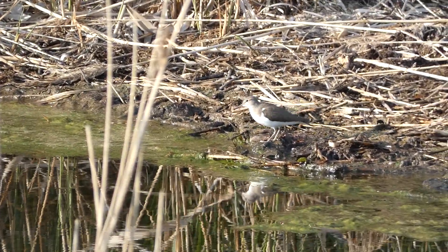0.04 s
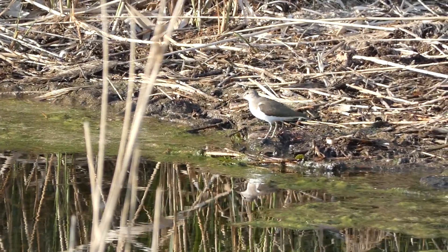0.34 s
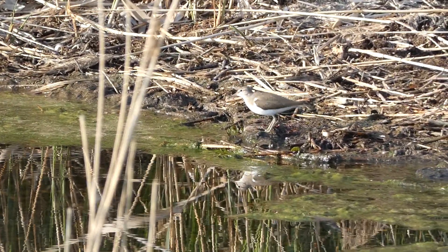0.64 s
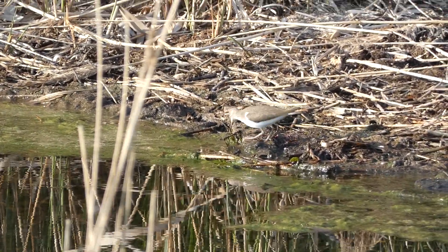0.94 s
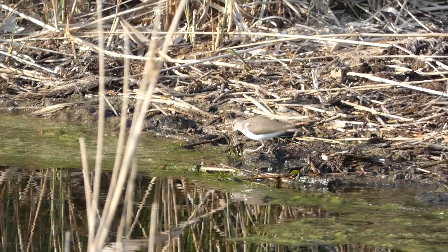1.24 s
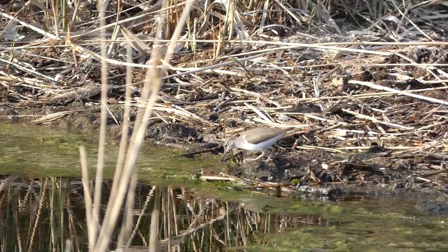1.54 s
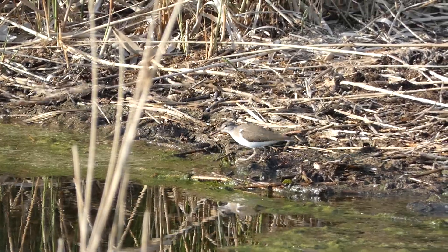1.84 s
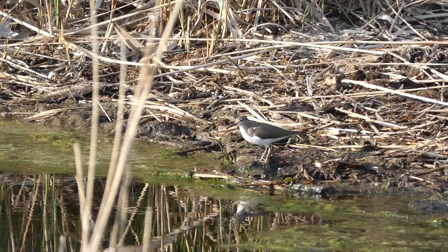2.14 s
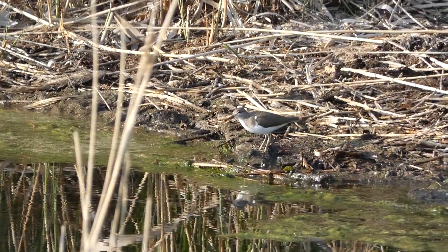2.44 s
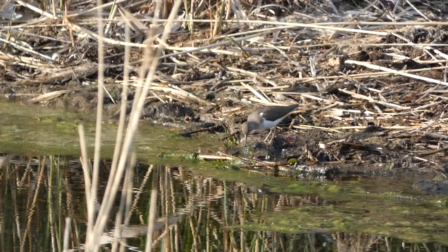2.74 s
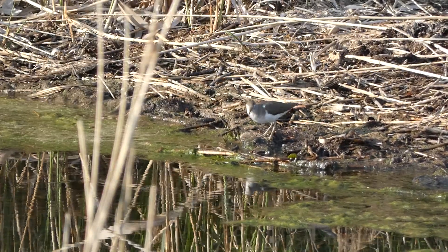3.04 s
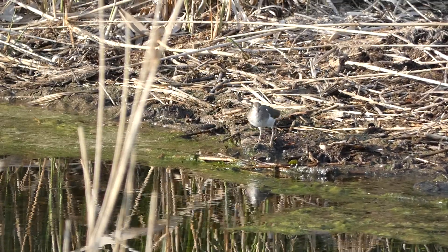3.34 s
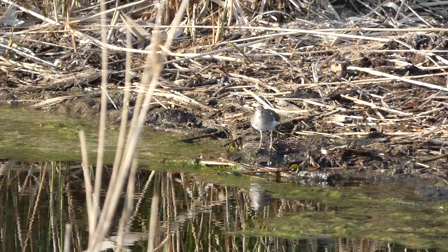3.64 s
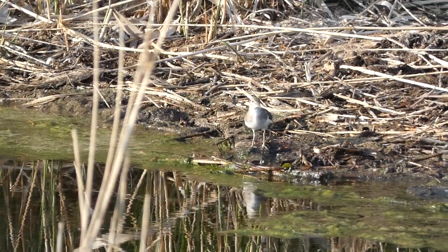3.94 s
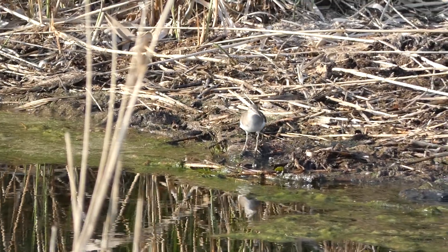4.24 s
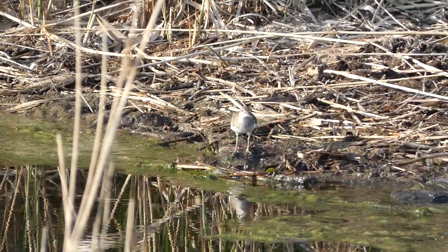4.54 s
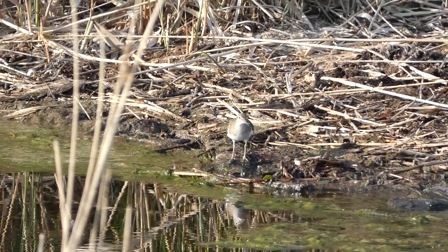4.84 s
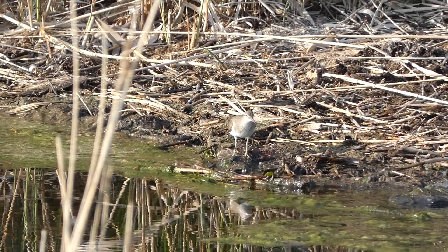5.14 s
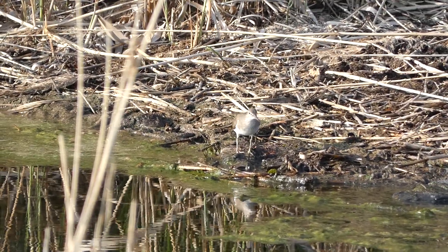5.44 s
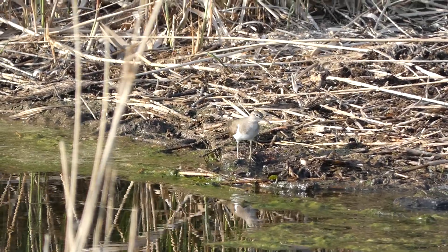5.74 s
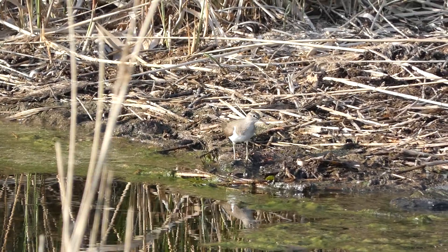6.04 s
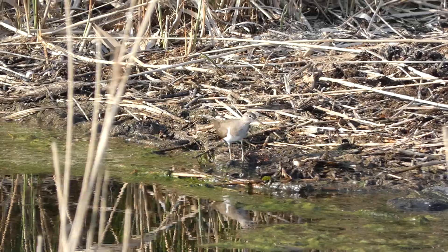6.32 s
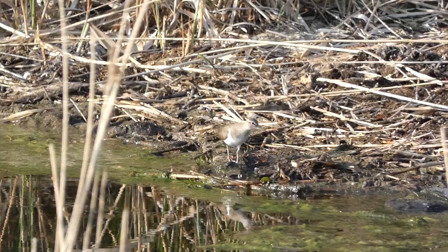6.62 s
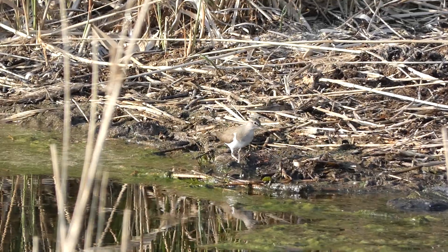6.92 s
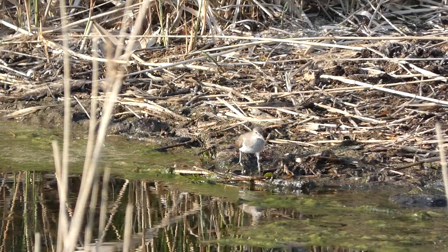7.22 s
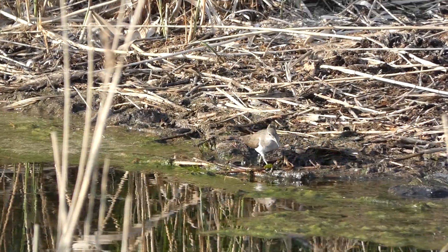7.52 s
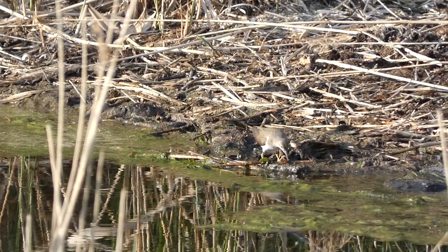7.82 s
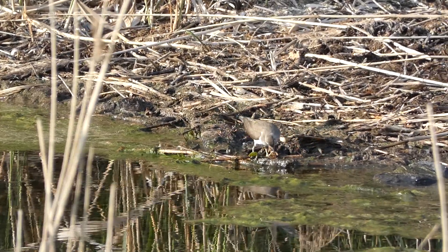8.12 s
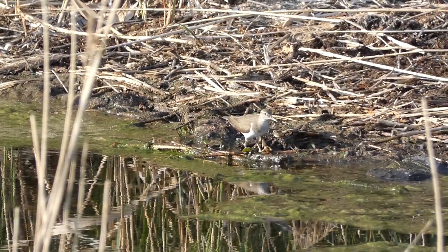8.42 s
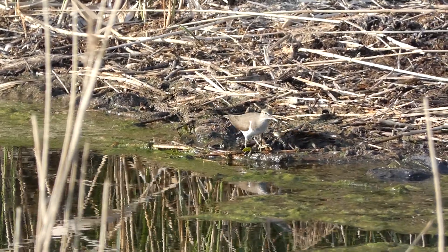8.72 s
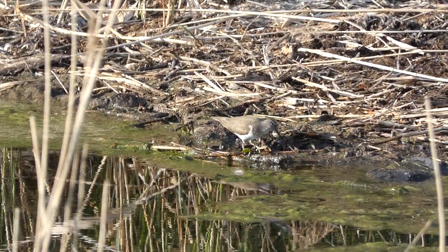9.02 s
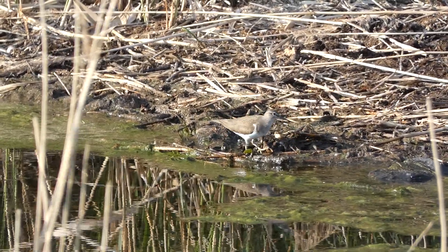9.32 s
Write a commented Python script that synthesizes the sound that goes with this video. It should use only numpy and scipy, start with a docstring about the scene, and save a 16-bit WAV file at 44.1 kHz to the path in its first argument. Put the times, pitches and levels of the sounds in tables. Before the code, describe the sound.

Small marsh birds chirp, buzz and warble amid crickets and a faint frog chorus, as low gusts of wind buffet the microphone.

```python
"""Marsh edge in a light breeze

Gusts buffet the microphone, their eddies rumbling and thumping. Out in the reeds, a little to the right,
small birds whistle, warble, rasp and chatter in quick pitch glides; three thin, high whistles arch
overhead. Two sharp knocks ring close by, and crickets chirp unevenly with their wings near 5 kHz.
Far off, frogs ring near 2 kHz over a low drone."""
import sys
import numpy as np
from scipy import signal
from scipy.fft import rfft, irfft, next_fast_len
from scipy.io import wavfile
from scipy.ndimage import uniform_filter1d

SR = 44100
rng = np.random.default_rng(int(sys.argv[2]) if len(sys.argv) > 2 else 0)


def bounce(signal):
    """Save signal as a 16-bit WAV file at the path given by the first command-line argument."""
    frames = np.transpose(np.atleast_2d(signal))
    limited = np.clip(frames, -1, 1)
    pcm = np.round(limited * 32767).astype(np.int16)
    wavfile.write(sys.argv[1], SR, pcm)


N = 417627
TIME = np.arange(N) / SR


def from_db(db):
    """Decibels to gain."""
    return np.exp(np.asarray(db) * np.log(10) / 20)


def unit_rms(x):
    """Scale to unit power."""
    return x / np.sqrt(np.mean(x ** 2) + 1e-20)


def in_time(rows, t=TIME):
    """The columns of a curve at the times t."""
    s, *columns = np.transpose(rows)
    return [np.interp(t, s, c) for c in columns]


def at_hz(points, hz):
    """Read a table on a log-frequency axis."""
    freqs, values = np.transpose(points)
    return np.interp(np.log(hz + 1e-9), np.log(freqs), values)


def drift(rate, size=N):
    """A smooth random wander of rms 1 that changes about rate times a second."""
    step, settle = 40, 2000
    pole = np.exp(-2 * np.pi * rate * step / SR)
    white = rng.standard_normal(size // step + settle + 2)
    slow = signal.lfilter([1], [1, -2 * pole, pole * pole], white)[settle:]
    return np.interp(np.arange(size) / step, np.arange(len(slow)), unit_rms(slow))


def add(track, s, sound):
    """Mix a sound into a track at time s."""
    at = round(s * SR)
    part = sound[max(-at, 0):max(N - at, 0)]
    track[max(at, 0):max(at, 0) + len(part)] += part


def panned(x, right_db):
    """Lean a sound to the right."""
    return x * from_db(np.array([[-right_db], [right_db]]) / 2)


def shaped(spectrum, skirt=4):
    """A colour that follows a spectrum and falls away past its ends."""
    low, high = spectrum[0][0], spectrum[-1][0]
    return lambda hz: (from_db(at_hz(spectrum, hz))
                       * np.minimum(hz / low, 1) ** skirt / np.maximum(hz / high, 1) ** skirt)


def resonance(centre_hz, half_width_hz):
    """A colour with one steep-sided peak."""
    return lambda hz: 1 / (1 + ((hz - centre_hz) / half_width_hz) ** 2)


def tone(hz):
    """A sine that follows a pitch curve."""
    return np.sin(2 * np.pi * (np.cumsum(hz) / SR + rng.random()))


def swell(u, edge):
    """Rise and fall of a note as u goes from 0 to 1; a small edge is abrupt."""
    return np.maximum(np.sin(np.pi * u), 0) ** edge


def syllables(rows, shape, vary=0.013, rough=0.0045):
    """One bird syllable repeated, a little higher or lower each time."""
    out, t = np.zeros(N), np.arange(0, shape[-1][0], 1 / SR)
    hz, contour_db = in_time(shape, t)
    for s, level_db in rows:
        pitch = hz * (1 + vary * rng.normal() + rough * drift(270, len(t)))
        add(out, s, from_db(level_db + contour_db) * swell(t / t[-1], 0.18) * tone(pitch))
    return out


# The far ambience across the stereo microphone: (frequency [Hz], left-right correlation [0-1])
AMBIENT_LIKENESS = [(60, 1), (200, 0.23), (500, 0.76), (800, 0.31), (1250, 0.016), (2100, 0.62),
                    (4500, 0.93), (8000, 0.38), (14000, 0.43)]
# Its lean: (frequency [Hz], left minus right [dB])
AMBIENT_BALANCE = [(60, -10), (110, 1), (200, -12), (380, -1.5), (700, -2), (1290, -2.5), (2380, -5),
                   (4400, -2), (8120, -3), (15000, 2)]


def noise(colour, likeness=AMBIENT_LIKENESS, balance=AMBIENT_BALANCE):
    """Steady stereo noise of rms 1, its spectrum shaped by colour(Hz)."""
    size = next_fast_len(N, True)
    hz = np.arange(size // 2 + 1) * SR / size
    mid, side = rfft(rng.standard_normal((2, size)))
    alike, sides = np.clip(at_hz(likeness, hz), -.99, .99), np.array([[1], [-1]])
    channels = np.sqrt(1 + alike) * mid + np.sqrt(1 - alike) * side * sides
    channels *= from_db(sides * at_hz(balance, hz) / 2)
    return unit_rms(irfft(channels * colour(hz))[:, :N])


# Gusts on the microphone: (time [s], length [s], level [dB], deep thud relative to the rumble [dB])
GUSTS = [(0.592, 0.33, -38, -5.5), (1.03, 0.33, -35, 0.5), (1.526, 0.085, -25.5, -5.5),
         (1.702, 0.024, -28, -1), (1.836, 0.34, -28, -5), (2.241, 0.41, -26, -9.5),
         (2.757, 0.59, -29, -12.5), (3.433, 0.46, -30, 0), (4.66, 0.36, -38, 4), (5.122, 0.12, -31, -14),
         (5.402, 0.058, -33.5, -0.5), (5.608, 0.54, -28, 0), (6.278, 0.53, -28, -9.5),
         (6.979, 0.24, -30, -8.5), (7.299, 0.65, -29, -10.5), (8.041, 0.84, -27.5, -26),
         (9.019, 0.23, -29.5, -29)]


def gusts(attack_s=0.093, release_s=0.054, sag_db_per_s=3, lull_db=-56.5):
    """Each gust hits, slackens and drops away; gives the wind's level and the thud's weight in dB."""
    power = np.full(N, from_db(lull_db) ** 2)
    deep = power.copy()
    for s, length, level_db, deep_db in GUSTS:
        t = TIME - s
        attack = np.clip(1 + t / attack_s, 0, 1) ** 2
        release = np.exp(-np.maximum(t - length, 0) / release_s)
        gust = (from_db(level_db - sag_db_per_s * t) * attack * release) ** 2
        power += gust
        deep += gust * from_db(deep_db) ** 2
    return 10 * np.log10(power), 10 * np.log10(deep / power)


# Wind rumble on the microphone: (frequency [Hz], level [dB])
RUMBLE_SPECTRUM = [(85, -11.5), (130, 1.5), (200, -1.5), (270, -9)]
# Wind across its two sides: (frequency [Hz], left-right correlation [0-1])
WIND_LIKENESS = [(60, 0.99), (130, 0.7), (250, 0.53), (400, 0.18)]
# The hardest buffets: (time [s], length [s], level [dB])
BUFFETS = [(1.579, 0.0098, -19), (2.933, 0.4, -32.5), (6.354, 0.15, -26.5), (7.297, 0.082, -27),
           (8.098, 0.44, -36.5)]


def wind(low_db=-0.12, upper_db=-11, lumps_db=4, surge_db=2.5, harden=0.46, steady_s=0.071):
    """Eddies hit the microphone in lumps; the hardest ones reach higher in pitch."""
    gust_db, deep_db = gusts()
    gust_db += surge_db * drift(9.7)
    eddies, buffets = drift(31.3), np.zeros(N)
    for s, length, db in BUFFETS:
        add(buffets, s, from_db(db) * signal.windows.tukey(int(length * SR), .5))
    thud = from_db(deep_db) * noise(shaped([(65, -8.5), (105, 0.5)]), WIND_LIKENESS, [(100, 0.0053)])
    rumble = noise(shaped(RUMBLE_SPECTRUM), WIND_LIKENESS, [(100, 0.0028)])
    low = (thud + rumble) * from_db(lumps_db * eddies)
    upper = noise(shaped([(230, 3), (330, 0), (480, -11.5), (800, -35)]), WIND_LIKENESS, [(300, -4.5)])
    upper *= from_db(6.5 * eddies)
    # Even out the slow swings, so that only the quick lumps ride on the gusts.
    low, upper = [band / np.sqrt(uniform_filter1d(np.mean(band ** 2, axis=0), int(steady_s * SR)))
                  for band in (low, upper)]
    upper_gain = from_db(gust_db + upper_db + harden * (gust_db + 20)) + buffets
    return from_db(gust_db + low_db) * low + upper_gain * upper


# Single eddies right on the microphone: (time [s], level [dB], pitch [Hz])
THUMPS = [(1.511, -13, 140), (1.584, -11, 181), (1.801, -14, 121), (2.031, -12, 131), (2.282, -10.5, 156),
          (2.43, -11, 134), (2.629, -10.5, 127), (3.412, -17.5, 159), (5.096, -16, 145), (5.809, -17, 204),
          (6.292, -11, 148), (6.33, -11.5, 160), (6.375, -18, 196), (7.176, -12, 189), (7.322, -13, 206),
          (7.417, -12.5, 176), (7.786, -17, 184), (8.058, -16, 209), (8.113, -14, 186), (8.237, -14, 175),
          (9.15, -12, 241)]


def thumps(gain_db=-4, rise_s=0.0065, pan_spread_db=3, sink=0.07):
    """An eddy shoves the microphone: a few low swings that build quickly, sink in pitch and die."""
    out, u = np.zeros((2, N)), np.arange(0, 9, 1 / (rise_s * SR))
    envelope = (u * np.exp(1 - u)) ** 2
    for s, level_db, hz in THUMPS:
        pitch = hz * (1 + sink * (np.exp(-u) * 2 - 1) + 0.13 * drift(110, len(u)))
        shove = from_db(level_db + gain_db) * envelope * tone(pitch)
        for channel, part in zip(out, panned(shove, pan_spread_db * rng.normal())):
            add(channel, s, part)
    return out


# Swallow-like chatter off to the right: (time [s], sweeps [count], level [dB])
RATTLES = [(3.013, 3, -41), (3.278, 3, -39.5), (3.519, 5, -40.5), (3.827, 4, -40.5), (5.041, 1, -47),
           (5.178, 1, -45), (5.209, 1, -42.5)]
# One sweep, then its tail: (time into the sweep [s], pitch [Hz], level [dB])
SWEEP = [(0, 4295, -17), (.005, 3630, -5.5), (0.01, 2650, -0.5), (0.014, 2300, -7)]
SWEEP_TAIL = [(.012, 3425, -7.5), (.018, 3140, -2.5), (.023, 2950, -12), (.028, 2870, -20)]


def chatter(period_s=.031, edge_db=-8.5, sweep_db=-3, tail_db=-4, low_ratio=0.67, low_db=-1.5):
    """A bird rattles off steep downward sweeps with two-voiced tails, loudest in mid-rattle."""
    beats = [(s + k * period_s, level_db + edge_db * ((2 * k + 1) / round(count) - 1) ** 2)
             for s, count, level_db in RATTLES for k in range(round(count))]
    delay, tails = SWEEP_TAIL[0][0], np.zeros(N)
    for ratio, voice_db in ((1, 0), (low_ratio, low_db)):
        starts = [(s + delay, db + voice_db) for s, db in beats]
        shape = [(s - delay, hz * ratio, db) for s, hz, db in SWEEP_TAIL]
        tails += syllables(starts, shape, vary=0.028, rough=0.019)
    sweeps = syllables(beats, SWEEP, vary=.04, rough=.05)
    return from_db(sweep_db) * sweeps + from_db(tail_db) * tails


# Whistles in the reeds: (time [s], length [s], start [Hz], middle [Hz], end [Hz], level [dB])
WHISTLES = [(2.24, 0.038, 2180, 2580, 2790, -59), (2.282, .032, 2300, 2500, 3200, -65),
            (0.189, 0.055, 3310, 3210, 3070, -54), (0.22, 0.031, 3120, 2450, 2030, -59),
            (1.336, 0.029, 4880, 5230, 5050, -54.5), (1.467, 0.025, 2000, 2090, 2080, -49.5),
            (0.217, 0.14, 3760, 3740, 3850, -63), (1.08, 0.069, 3240, 3940, 3900, -71),
            (3.003, .03, 2280, 2900, 2690, -53.5), (2.055, 0.011, 2200, 2380, 2490, -51),
            (2.098, 0.027, 2400, 2160, 3000, -51.5), (4.072, 0.09, 6650, 5600, 6200, -67.5),
            (4.254, 0.069, 6400, 5700, 6000, -61), (4.255, .05, 3650, 3270, 2280, -55),
            (4.849, 0.019, 2311, 3296, 4270, -47.5), (5.089, 0.072, 4700, 3950, 3980, -55.5),
            (5.118, .055, 3350, 2920, 2500, -62), (5.295, 0.056, 4250, 4020, 3950, -57),
            (5.366, .036, 3620, 3900, 3450, -60), (5.404, 0.0056, 3900, 3100, 2900, -53),
            (5.414, .009, 3700, 3210, 2700, -46.5), (5.423, 0.0265, 3400, 2670, 3500, -52),
            (5.297, 0.084, 3870, 3240, 3380, -56.5), (5.502, 0.067, 3080, 2960, 2963, -59.5),
            (5.551, 0.072, 3700, 3500, 2870, -54.5), (5.711, 0.08, 3200, 2930, 3600, -58),
            (5.798, 0.042, 3700, 2940, 2700, -55.5), (5.96, 0.039, 2444, 2960, 3340, -61.5),
            (6.098, 0.06, 2600, 3130, 3200, -58.5), (6.04, .014, 2600, 2370, 2050, -56),
            (6.95, 0.022, 2900, 3230, 4040, -59), (7.261, 0.038, 2510, 2540, 3000, -58),
            (7.378, 0.082, 2380, 2650, 2830, -61), (6.598, 0.023, 2850, 3050, 3200, -66),
            (7.11, .065, 2200, 2620, 2850, -65), (8.004, 0.063, 3300, 3720, 4200, -66),
            (5.578, 0.032, 2740, 2450, 2200, -59)]


def whistles(quaver=0.016, flutter_db=2):
    """Each note bends smoothly through three pitches and flutters on its way through the air."""
    out = np.zeros(N)
    for s, length, *pitches, level_db in WHISTLES:
        u = np.linspace(0, 1, int(length * SR))
        bend = np.polyval(np.polyfit([0, .5, 1], pitches, 2), u)
        hz = bend * (1 + quaver * drift(250, len(u)))
        gain = from_db(level_db + flutter_db * drift(90, len(u)))
        add(out, s, gain * swell(u, .3) * tone(hz))
    return out


# Buzzing birds in the reeds: (time [s], length [s], start [Hz], end [Hz], swing [Hz],
# swing rate [1/s], hoarseness [0-1], level [dB])
BUZZES = [(0.708, 0.046, 3200, 3070, 790, 45, 0.07, -55), (0.947, 0.04, 3000, 2850, 800, 43, 0.16, -53.5),
          (1.191, 0.063, 3500, 2870, 600, 95, 0.27, -53), (1.675, 0.028, 3600, 3280, 420, 120, 0.08, -52),
          (1.751, 0.049, 3350, 3200, 470, 100, .03, -48.5),
          (2.413, 0.096, 5100, 4810, 563, 160, 0.02, -48.5), (2.72, 0.025, 3100, 2970, 650, 100, 0.04, -52),
          (2.786, 0.022, 3200, 2960, 596, 85, 0.1, -52.5), (4.128, 0.045, 3100, 3064, 658, 91, 0.13, -52),
          (4.213, 0.028, 3000, 3770, 598, 100, .1, -49.5), (5.577, 0.076, 5180, 4890, 553, 210, 0.04, -51),
          (5.777, 0.05, 3900, 3730, 600, 53, 0, -58), (2.627, 0.034, 5050, 5280, 260, 42, .01, -63),
          (8.167, 0.091, 5200, 4800, 676, 165, 0.05, -45.5)]


def buzzes(unsteady=0.22, falling_db=2, bottom_db=1.5):
    """The pitch swings quickly while its centre glides; jitter turns it into a hoarse rasp."""
    out = np.zeros(N)
    for s, length, start_hz, end_hz, swing_hz, rate, hoarse, level_db in BUZZES:
        u = np.linspace(0, 1, int(length * SR))
        sway = tone(rate * (1 + unsteady * drift(41, len(u))))
        hz = start_hz + (end_hz - start_hz) * u + swing_hz * sway
        hz *= 1 + hoarse * drift(600, len(u))
        # Louder while the pitch falls, and at the bottom of each swing.
        pulse = unit_rms(from_db(-falling_db * unit_rms(np.gradient(sway)) - bottom_db * sway))
        add(out, s, from_db(level_db) * swell(u, 0.26) * pulse * tone(hz))
    return out


# Four hooked syllables from the reeds: (time [s], level [dB])
HOOKS = [(4.445, -47), (4.61, -45.5), (4.783, -43.5), (4.946, -43)]
# The hook, and the slur that leads in: (time from its own start [s], pitch [Hz], level [dB])
HOOK = [(0, 3070, -9), (.018, 4460, -0.5), (.04, 4550, -2.5), (.06, 5200, -9), (0.073, 6000, -11)]
LEAD_IN = [(0, 3960, -7), (.02, 3120, -11), (0.056, 2500, -2)]


def hooks(lead_s=0.024):
    """A bird sings a rising hook, each time with a scratchy falling slur under its start."""
    rising = syllables(HOOKS, HOOK, vary=0.0055, rough=0.02)
    return rising + syllables([(s - lead_s, db) for s, db in HOOKS], LEAD_IN, vary=0.033, rough=0.057)


# A yellowhammer, right of centre: (time [s], first chip [dB], whistle [dB], whistle hoarseness [0-1])
YELLOWHAMMER_SONGS = [(.654, -55.5, -52.5, 0), (8.042, -55, -60.5, 0)]
# One chip: (time into the chip [s], pitch [Hz], level [dB])
CHIP = [(0, 5920, -12.5), (.006, 6560, -11), (.014, 6300, -7), (0.029, 6010, -1)]


def yellowhammer(count=7, period_s=.121, grow_db=0.63, ring_delay_s=.835, ring_s=.52, fade_db_per_s=17):
    """Evenly spaced chips grow louder and lead into a finely buzzing whistle that sinks and fades."""
    start_hz, end_hz, swing_hz, swings_per_s = 5330, 5030, 130, 230
    out, t = np.zeros(N), np.arange(0, ring_s, 1 / SR)
    for s, chip_db, ring_db, hoarse in YELLOWHAMMER_SONGS:
        chips = [(s + k * period_s, chip_db + k * grow_db) for k in range(count)]
        out += syllables(chips, CHIP, rough=0.03)
        sway = tone(swings_per_s * (1 + 0.16 * drift(60, len(t))))
        hz = start_hz + (end_hz - start_hz) * t / ring_s + swing_hz * sway
        hz *= 1 + hoarse * drift(300, len(t))
        envelope = from_db(ring_db - fade_db_per_s * t) * swell(t / ring_s, 0.13)
        add(out, s + ring_delay_s, envelope * tone(hz))
    return out


# Warbles in the reeds: (time [s], length [s], start [Hz], end [Hz], level [dB])
WARBLES = [(1.976, 0.093, 5030, 4450, -49), (3.384, 0.091, 5030, 4520, -51), (8.082, 0.11, 5000, 4880, -53)]


def warbles(dip_hz=1242, dips_per_s=50):
    """A rounded whistle that plunges in sharp, even dips."""
    out = np.zeros(N)
    for s, length, start_hz, end_hz, level_db in WARBLES:
        t = np.arange(0, length, 1 / SR)
        dips = 1 - abs(np.cos(np.pi * dips_per_s * t))
        hz = start_hz + (end_hz - start_hz) * t / length - dip_hz * dips
        add(out, s, from_db(level_db) * swell(t / length, 0.59) * tone(hz))
    return out


# Long rising calls from the reeds: (time [s], level [dB])
UPSLURS = [(2.495, -57), (6.345, -61), (8.605, -56.5)]
# One call: (time into the call [s], pitch [Hz], level [dB])
UPSLUR = [(0, 3080, -14), (0.044, 3404, -4), (0.088, 3540, -7), (.11, 4110, 4), (.125, 4730, 9),
          (0.134, 4990, -15)]


def upslurs():
    """A bird's whistle climbs slowly, then flicks upward at its loudest."""
    return syllables(UPSLURS, UPSLUR, rough=.008)


# Two nasal notes from the reeds: (time [s], length [s], pitch [Hz], level [dB])
NASALS = [(0.468, 0.024, 582, -52.5), (0.502, 0.03, 617, -52.5)]
# What reaches the microphone: (harmonic [number], level [dB])
NASAL_HARMONICS = [(4, 0.5), (5, -2), (6, -3.5)]


def nasals(droop=0.063, rough=0.0072):
    """Short arched notes of which only a few upper harmonics carry."""
    out = np.zeros(N)
    for s, length, pitch_hz, level_db in NASALS:
        u = np.linspace(0, 1, int(length * SR))
        hz = pitch_hz * (1 - droop * (2 * u - 1) ** 2 + rough * drift(200, len(u)))
        voice = sum(from_db(level_db + db) * tone(round(k) * hz) for k, db in NASAL_HARMONICS)
        add(out, s, swell(u, .5) * voice)
    return out


# Thin whistles overhead: (time [s], length [s], crest [Hz], crest position [0-1], pointedness [exponent],
# first dip [s], second dip [s], hoarse break [s], its half-width [s], side tones [dB], level [dB])
ARCHES = [(1.789, 0.7, 10870, 0.28, 0.7, 2.125, 2.265, 1.85, 0.036, -7.5, -66),
          (4.426, 0.69, 10580, 0.46, 0.39, 4.79, 4.925, 4.6, .11, -5.5, -66),
          (7.21, .66, 11220, 0.32, .72, 7.42, 7.575, 7.33, 0.055, -20, -63.5)]


def arches(foot_hz=6730, dip_depths_hz=(950, 1280), dip_width_s=0.05, side_hz=1400, lower_db=-10):
    """A whistle breaks up briefly as it climbs, grows side tones near the top and dips twice going down."""
    quaver, wobble, hoarse, shimmer_db = .007, .02, .016, 2.5
    clearest_hz, loss_db_per_khz = 9530, 5   # the voice weakens away from its best pitch
    out = np.zeros(N)
    for s, length, crest_hz, crest_at, pointed, *dips, break_s, width_s, side_db, level_db in ARCHES:
        t = np.arange(s, s + length, 1 / SR)
        u, size = (t - s) / length, len(t)
        skew = np.log(.5) / np.log(crest_at)
        hz = foot_hz + (crest_hz - foot_hz) * swell(u ** skew, pointed)
        for dip_s, dip_hz in zip(dips, dip_depths_hz):
            hz -= dip_hz * np.exp(-((t - dip_s) / dip_width_s) ** 2)
        broken = np.exp(-((t - break_s) / width_s) ** 2)
        waver = (quaver + wobble * broken) * drift(40, size)
        pitch = hz * (1 + waver + hoarse * (broken + .2) * drift(700, size))
        spacing = side_hz * (hz / 10500) ** 2 * (1 + 0.072 * drift(8, size))
        side_gain = np.clip((hz - 8000) / 2000, 0, 1) * from_db(side_db)
        partials = ((0, 0.75), (0.87, side_gain), (-1, side_gain * from_db(lower_db)))
        voice = sum(gain * from_db(shimmer_db * drift(45, size)) * tone(pitch + k * spacing)
                    for k, gain in partials)
        loss_db = loss_db_per_khz * abs(hz - clearest_hz) / 1000
        add(out, s, from_db(level_db - loss_db) * swell(u, 0.19) * voice)
    return out


# Two knocks and their rattles, close to the microphone: (time [s], level [dB], dull above [Hz])
KNOCKS = [(.296, -34, 4500), (.3005, -47, 5000), (2.1825, -32.5, 2100), (2.191, -48, 3500),
          (2.1985, -45, 3500), (2.288, -50, 9000)]
# What they set ringing: (frequency [Hz], level [dB], time to fall 60 dB [s])
KNOCK_MODES = [(717, 6, 0.024), (1262, 1, 0.016), (1940, 10.5, 0.011), (2070, -9, 0.051), (2620, -1, 0.025),
               (3270, -1, 0.017), (4050, -12, 0.043)]


def knocks(crack_db=-10, snap_db=-21, decay_s=0.006):
    """A short burst of contact noise, topped by a faint bright snap, sets a few dry modes ringing."""
    out, t = np.zeros(N), np.arange(SR // 8) / SR

    def burst(*band_hz):
        band = signal.butter(2, band_hz, "band", fs=SR, output="sos")
        return signal.sosfilt(band, rng.standard_normal(len(t))) * np.exp(-t / decay_s)

    for s, level_db, dull_hz in KNOCKS:
        ring = sum(from_db(db - 60 * t / t60) * np.sin(2 * np.pi * hz * t) * rng.choice([-1, 1])
                   for hz, db, t60 in KNOCK_MODES)
        crack = from_db(crack_db) * burst(600, 3300)
        snap = from_db(snap_db) * burst(3500, 10000)
        body = signal.sosfilt(signal.butter(2, dull_hz, fs=SR, output="sos"), ring + crack)
        add(out, s, from_db(level_db) * (body + snap))
    return out


def chirps(rows, stroke_s=.023, fall_hz=520, period_s=.035, grow_db=0.5, rough=.012, strokes=3):
    """A cricket's chirp is a few wing strokes, each falling in pitch and louder than the one before."""
    out, u = np.zeros(N), np.linspace(0, 1, int(stroke_s * SR))
    for s, level_db, pitch_hz in rows:
        period = period_s * (4700 / pitch_hz) ** 2   # smaller insects beat faster
        for k in range(strokes):   # counted back from the last stroke
            hz = pitch_hz * (1 + rough * drift(300, len(u))) - fall_hz * (u - .5)
            gain = from_db(level_db - grow_db * k * (k + 1) / 4)
            add(out, s - k * period - stroke_s / 2, gain * swell(u, 0.92) * tone(hz))
    return out


# The cricket nearest the microphone: (time of the last stroke [s], level [dB])
NEAR_CHIRPS = [(.392, -52.5), (.715, -50.5), (0.926, -51), (1.209, -48.5), (1.498, -44), (1.752, -46),
               (2.032, -48), (2.255, -50), (2.772, -53.5), (3.054, -58), (3.855, -52), (4.409, -54),
               (5.026, -53.5), (5.308, -59), (5.558, -53), (5.9, -53.5), (6.205, -51.5), (6.697, -52),
               (7.013, -46), (7.259, -49), (7.513, -50.5), (7.78, -46.5), (8.036, -47.5), (9.07, -53.5)]
# A smaller, higher cricket: (time of the last stroke [s])
HIGH_CHIRPS = [.655, .885, 1.272, 3.137, 3.342, 3.797, 4.22, 5.21, 5.85, 6.077, 6.282, 6.495, 6.872, 7.29,
               8.826]


def near_crickets(near_hz=4710, high_hz=5020, high_db=-54):
    """Two crickets stand out of the chorus, each at its own pitch and uneven pace."""
    nearest = chirps([(s, level_db, near_hz) for s, level_db in NEAR_CHIRPS])
    return nearest + chirps([(s, high_db, high_hz) for s in HIGH_CHIRPS])


def far_crickets(level_db=-55, spread_db=4, count=80):
    """Farther out, many more crickets chirp at their own moments."""
    return chirps([((k + when) * N / SR / count, level_db - spread_db * faint, 4620 + 370 * pitch)
                   for k, (when, faint, pitch) in enumerate(rng.random((count, 3)))])


def far_birds(peak_db=-62, loudest_s=4, fade_db_per_s=1.7, count=150):
    """Distant birds slur short, scratchy notes at random, more often up than down."""
    out = np.zeros(N)
    for k, (when, length, pitch, slur, loud) in enumerate(rng.random((count, 5))):
        s = (k + when) * N / SR / count
        u = np.linspace(0, 1, int((.018 + .05 * length) * SR))
        hz = (2350 + 1250 * pitch) * (1 + 0.45 * (slur - .4) * u + 0.03 * drift(200, len(u)))
        level_db = peak_db - fade_db_per_s * abs(s - loudest_s) + 7 * (loud - .5)
        add(out, s, from_db(level_db) * swell(u, 1) * tone(hz))
    return out


# Choruses far across the marsh: (time [s], frogs [dB], insects [dB])
CHORUSES = [(0, -62, -53), (1.5, -60.5, -56.5), (2.7, -66, -58), (4.7, -56.5, -55), (6.5, -62.5, -59),
            (7.5, -61.5, -57), (9.1, -57.5, -55)]


def choruses(frog_gain_db=1, throb_db=2.5, insect_gain_db=-4.5):
    """Frogs and insects, blurred by distance into two ringing bands."""
    frogs_db, insects_db = in_time(CHORUSES)
    frogs = from_db(frogs_db + frog_gain_db + throb_db * drift(33)) * noise(resonance(2034, 97))
    insect_band = shaped([(4350, -2.5), (4650, 1.5), (5000, 0.5), (5200, -9)], skirt=120)
    return frogs + from_db(insects_db + insect_gain_db) * noise(insect_band)


# The drone in the distance: (frequency [Hz], level [dB])
DRONE_SPECTRUM = [(60, -4), (100, 2.5), (200, -15.5), (290, -16.5), (420, 1), (580, -9), (820, -4.5),
                  (950, -7.5), (1120, -6), (1400, -12.5), (1700, -56)]
# Its resonances: (frequency [Hz], half-width [Hz], level [dB])
HUM_RESONANCES = [(496, 12, -54), (672, 27.5, -58), (799.5, 20.7, -56.5)]


def drone(roar_db=-49.5, waver_db=2):
    """A far, steady roar with a wavering hum from three narrow resonances."""
    roar = from_db(roar_db) * noise(shaped(DRONE_SPECTRUM))
    hum = noise(lambda f: sum(from_db(db) * resonance(hz, width)(f) / np.sqrt(width)
                              for hz, width, db in HUM_RESONANCES))
    hum *= np.linalg.norm([from_db(db) for _, _, db in HUM_RESONANCES])   # they add in power
    return roar + hum * from_db(waver_db * drift(5.2))


# Open air all round the microphone: (frequency [Hz], level [dB])
AIR_SPECTRUM = [(1500, 10.5), (2600, 2), (3300, -5), (4200, -2), (5400, -5.5), (6300, -8), (7300, -13.5),
                (8400, -19.5), (9600, -13.5), (11500, -21), (15000, -27)]


def air(level_db=-58):
    """A faint, steady hiss behind everything."""
    return from_db(level_db) * noise(shaped(AIR_SPECTRUM))


def marsh(x, wet_db, t60=0.2, echo_s=0.0057, echo_db=-11):
    """One early echo off the bank, then a thin scatter from the reeds."""
    t = np.arange(SR // 2) / SR
    shared, own = rng.standard_normal(len(t)), rng.standard_normal((2, len(t)))
    scatter = (shared + 0.13 * own) * from_db(-60 * t / t60) * (t > echo_s)
    scatter /= np.sqrt(np.sum(scatter ** 2) / 2)
    reeds = signal.oaconvolve(x[None], scatter, axes=1)[:, :N]
    echo = np.interp(TIME - echo_s, TIME, x, left=0)
    return x + from_db(echo_db) * echo + from_db(wet_db) * reeds


def scene():
    """From the marsh edge: wind on the microphone, most birds and the crickets a little to the right."""
    songs = from_db(4) * whistles() + nasals() + warbles() + far_birds() + from_db(-3.5) * hooks()
    rasps = marsh(from_db(-1) * buzzes(), wet_db=-2, echo_db=-7)
    rasps += marsh(from_db(-2.5) * yellowhammer(), wet_db=-2.5, t60=0.26, echo_db=-20)
    rising = marsh(from_db(4) * upslurs(), wet_db=-7)
    songs = marsh(songs, wet_db=-7, t60=0.3, echo_db=-8.5)
    rattles = marsh(chatter(), wet_db=-10, echo_db=-12)
    birds = panned(songs + rising, 6.9) + panned(rasps, 5.6) + panned(rattles, 8)
    overhead = panned(marsh(from_db(4) * arches(), wet_db=-10, echo_db=-18.5), -.6)
    crickets = panned(marsh(near_crickets() + far_crickets(), wet_db=-14.5, echo_db=-19), 7)
    close = panned(marsh(knocks(), wet_db=-9, t60=0.07, echo_db=-27), 4.6)
    distance = drone() + choruses() + air()
    return wind() + thumps() + birds + overhead + close + crickets + distance


def record(dry, low_cut_hz=52, high_cut_hz=15150):
    """The microphone sheds the deepest bass; the top is cut steeply."""
    dry = signal.sosfilt(signal.butter(3, low_cut_hz, "high", fs=SR, output="sos"), dry)
    return signal.sosfilt(signal.ellip(10, .1, 80, high_cut_hz, fs=SR, output="sos"), dry)


dry = scene()
out = record(dry)
bounce(out)
```